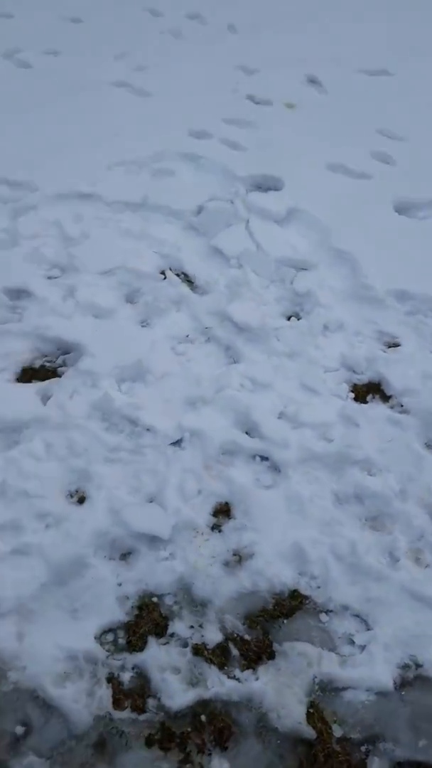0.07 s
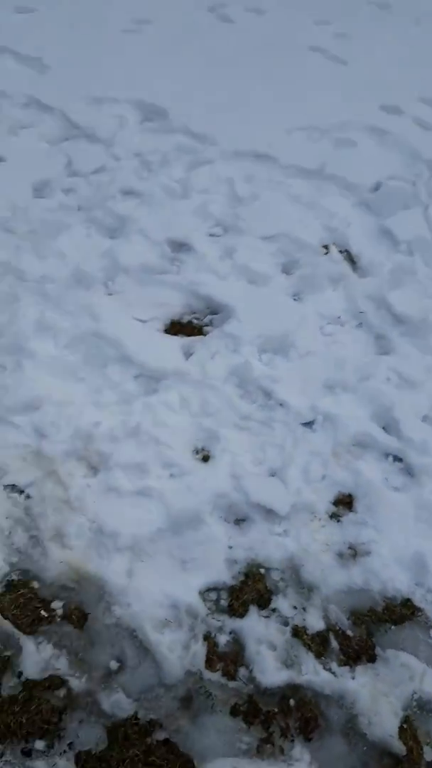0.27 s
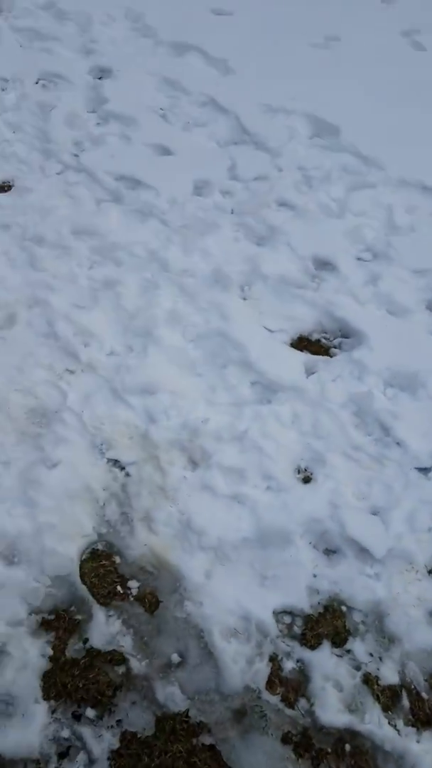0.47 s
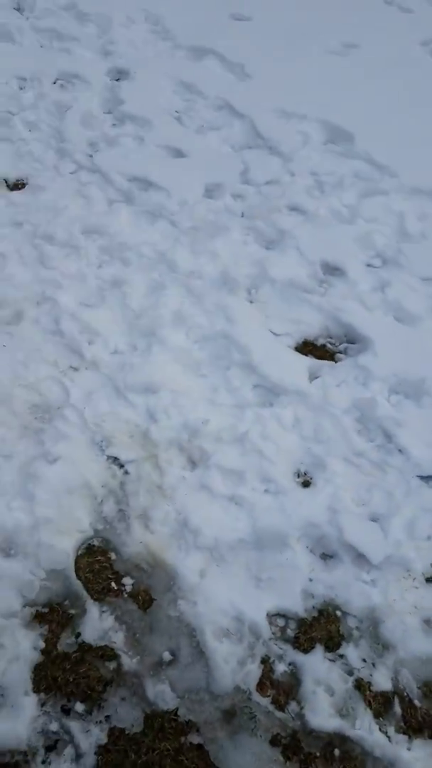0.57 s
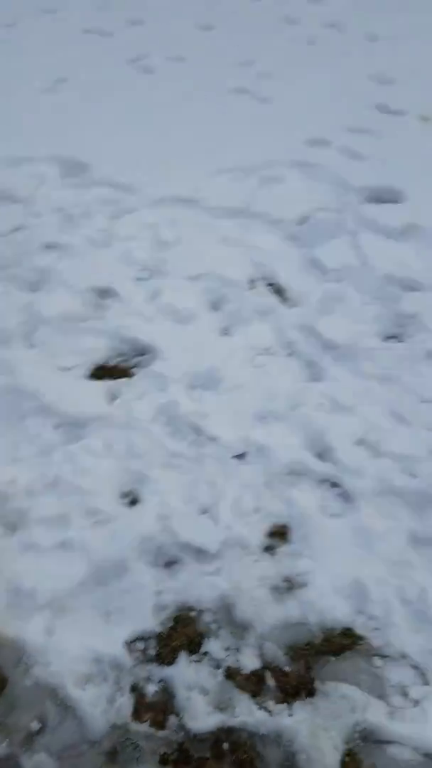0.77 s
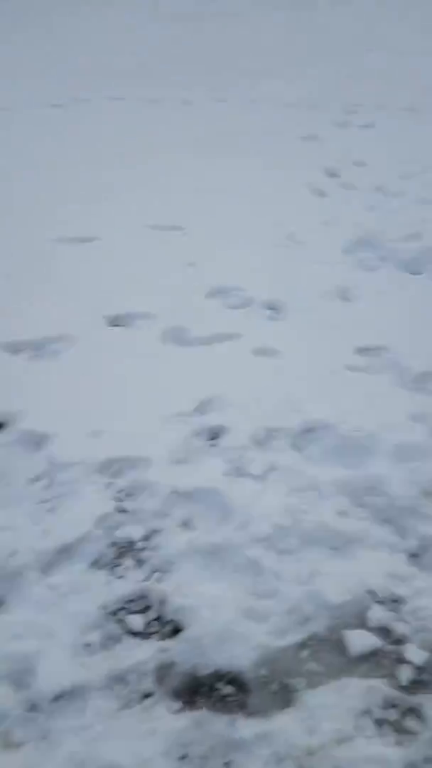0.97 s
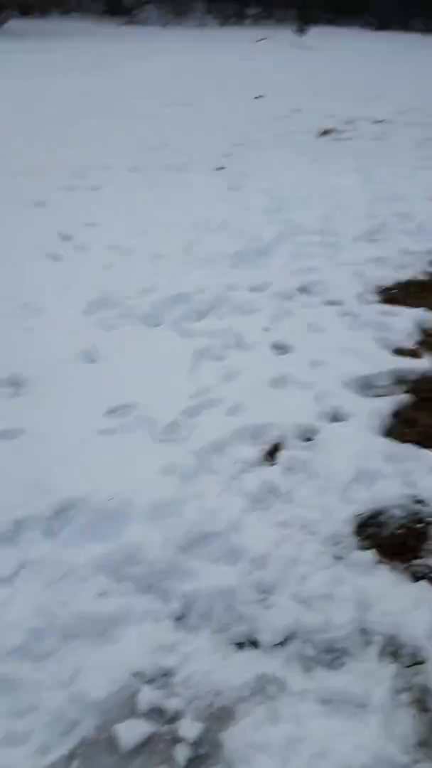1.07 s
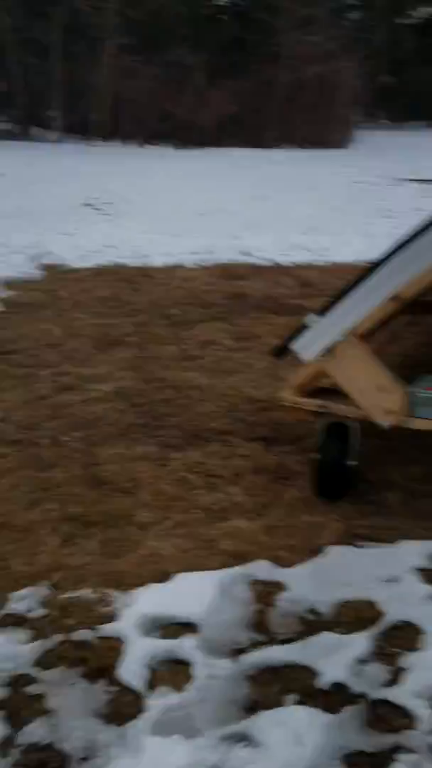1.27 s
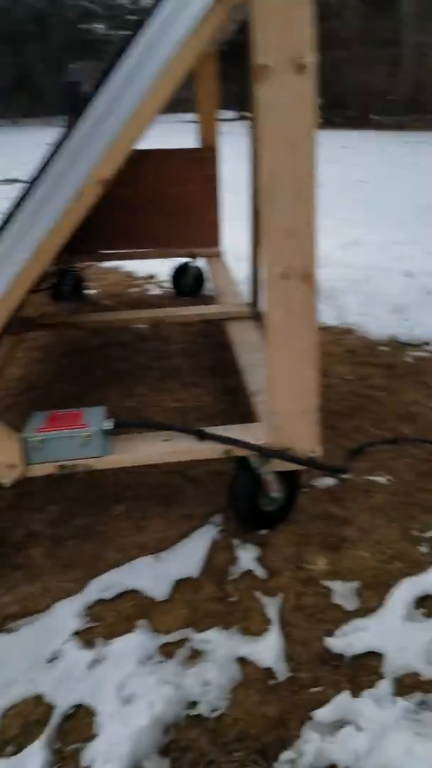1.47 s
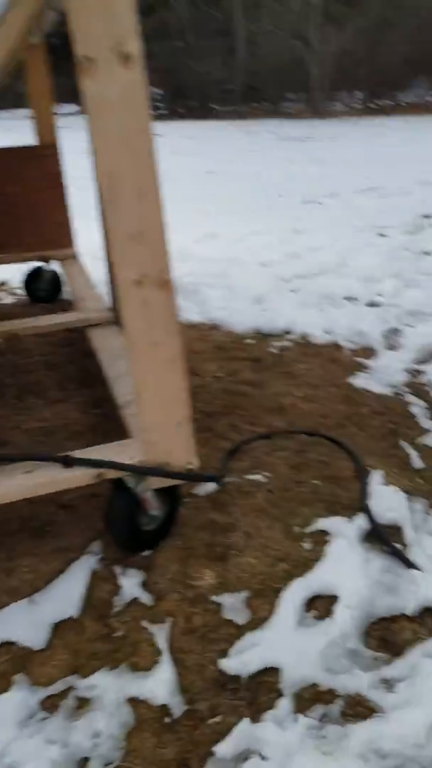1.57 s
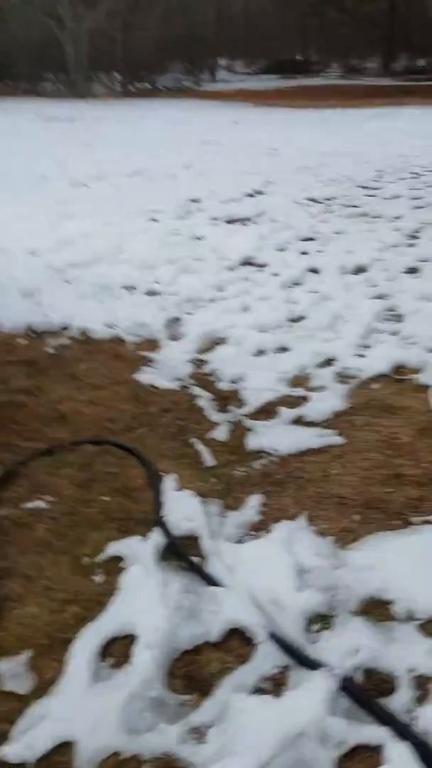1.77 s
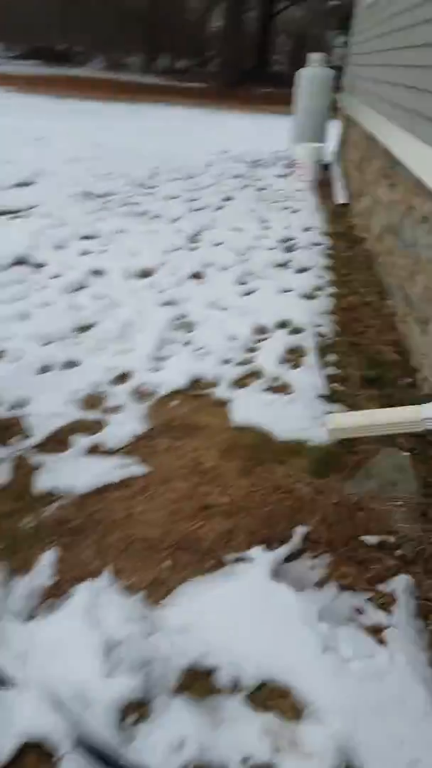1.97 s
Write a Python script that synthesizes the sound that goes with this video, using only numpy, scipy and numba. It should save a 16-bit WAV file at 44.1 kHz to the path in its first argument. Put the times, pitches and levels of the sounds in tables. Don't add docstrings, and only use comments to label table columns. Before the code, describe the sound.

Slow footsteps crunch on thin, crusty wet snow in a quiet yard, close by

```python
import sys
import numpy as np
from scipy import signal
from scipy.fft import irfft, next_fast_len
from scipy.io import wavfile
from scipy.ndimage import uniform_filter1d, map_coordinates
from numba import njit

SR = 44100
rng = np.random.default_rng(int(sys.argv[2]) if len(sys.argv) > 2 else 0)


def put_to_file(sound):
    columns = np.atleast_2d(sound).T
    safe = np.clip(columns, -1, 1)
    whole_steps = np.round(safe * 32767)
    wavfile.write(sys.argv[1], SR, whole_steps.astype(np.int16))


def magnitude_from_level(level_db):
    exponent = np.asarray(level_db, float) / 20
    return 10 ** exponent


N = 89655

# (time [s], level [dB], pitch [Hz], ring t60 [s])
PACKING_THUDS = [(0.0139, -42, 300, 0.018), (.0185, -40.5, 480, 0.018), (0.1254, -21, 586, 0.0067),
                 (.127, -17, 407, 0.01), (0.1325, -36, 560, 0.015), (0.136, -24, 613, 0.05),
                 (0.1409, -26, 510, 0.0056), (0.1463, -28.5, 380, 0.01), (0.1513, -36, 435, 0.0088),
                 (0.1635, -48, 447, 0.024), (0.171, -45, 398, 0.022), (0.1846, -23.5, 400, 0.02),
                 (0.206, -45, 420, 0.04), (0.248, -47, 348, 0.051), (0.5041, -36.5, 230, 0.007),
                 (0.5055, -40.5, 600, 0.011), (0.5218, -32, 200, 0.02), (0.5371, -41, 304, 0.044),
                 (0.944, -45, 190, 0.029), (1.0390, -37, 350, 0.021), (1.1260, -48, 438, 0.068),
                 (1.7036, -45, 450, 0.023), (1.713, -50, 520, 0.012), (1.7232, -27.5, 483, 0.027),
                 (1.7318, -10.5, 476, 0.014), (1.739, -39, 510, 0.014), (1.7426, -36, 565, 0.012),
                 (1.7509, -30.5, 490, 0.0091), (1.7590, -21.5, 563, 0.031), (1.7670, -26, 613, 0.025),
                 (1.7725, -38, 560, 0.013), (1.7795, -38, 527, 0.01), (1.7966, -29.5, 530, 0.0084),
                 (1.806, -50, 406, 0.045), (1.826, -40, 570, .02), (1.87, -42.5, 536, 0.052),
                 (1.9224, -29.5, 565, 0.042), (1.9255, -33.5, 910, 0.026), (1.934, -36.5, 597, 0.015),
                 (2.0209, -37.5, 665, 0.022)]
# (time [s], level [dB], pitch [Hz], treble [dB])
CRUST_SNAPS = [(0.0201, -42.5, 3000, -14), (0.1255, -36, 3150, -10.5), (0.1264, -45, 4800, -13),
               (0.14, -36.5, 3010, -23), (0.148, -51, 1980, -21), (0.1546, -42.5, 2140, -20),
               (0.1838, -45.5, 2100, -19), (0.282, -51, 1780, -29), (0.2929, -50.5, 1870, -28),
               (0.3958, -47, 2100, -13), (0.5042, -51.5, 2030, -24), (0.5539, -43.5, 3300, -17),
               (0.5661, -43, 3100, -18), (0.5744, -50, 3260, -18), (0.5982, -49.5, 2700, -16),
               (0.9826, -44.5, 2290, -15), (0.9824, -49, 5470, -9), (1.035, -45.5, 1600, -18),
               (1.0572, -47.5, 1850, -22), (1.0777, -47, 2960, -15), (1.1123, -41.5, 2120, -20),
               (1.1278, -46, 1880, -17), (1.1673, -42, 1970, -26), (1.2158, -52.5, 4470, 0),
               (1.2435, -55, 2410, -8), (1.272, -66, 3820, -12), (1.289, -69, 3000, 7),
               (1.3354, -48, 5600, -4), (1.7038, -45, 2120, -8), (1.726, -39, 2630, -10),
               (1.7317, -19.5, 1765, -27), (1.7362, -26, 1770, -15), (1.7588, -30, 1570, -26),
               (1.7752, -34, 1970, -27), (1.7414, -31, 2700, -12), (1.7645, -35, 2420, -12),
               (1.7825, -34, 2110, -16), (1.7962, -33, 1530, -13), (1.8086, -41.5, 2170, -15),
               (1.8616, -41.5, 3280, -10), (1.873, -59, 3050, 2), (1.879, -40.5, 1480, -8),
               (1.9044, -41, 2040, -22), (1.9157, -44, 2160, -3.5), (1.9225, -28.5, 2100, -15.5),
               (1.938, -44, 2160, -1), (1.997, -65, 2500, 6)]
# (start [s], level [dB], hold [s], fade t60 [s], treble [dB])
CRUSH_PUSHES = [(0, -58.5, 0.021, 0.022, 2.5), (0.124, -40.5, 0.0049, 0.015, -12.5),
                (0.129, -50, 0.024, 0.073, -16), (0.287, -61.5, 0.1, 0.075, -30),
                (0.53, -58, 0.04, 0.52, -10), (1.046, -62, 0.083, .1, -13),
                (1.201, -60.5, 0.0078, 0.018, 7), (1.213, -55, .006, .015, 4.5),
                (1.336, -55, 0.0037, 0.016, 5.5), (1.341, -59.5, .012, .05, 3),
                (1.6, -56.5, 0.009, 0.02, 5.5), (1.7023, -44.5, 0.038, 0.084, 0),
                (1.7205, -35.5, 0.023, 0.078, -8), (1.748, -42, 0.014, 0.096, -2.5),
                (1.774, -49, 0.01, 0.047, -9), (1.798, -48, 0.0039, 0.05, 0),
                (1.821, -58, 0.017, 0.043, 8.5), (1.852, -56, 0.043, .08, -7.5),
                (1.899, -53, 0.0076, 0.054, 1), (1.922, -38, 0.0065, 0.023, 0),
                (1.958, -62.5, 0.0048, 0.026, 11.5), (1.959, -60, 0.031, 0.53, 2.5),
                (2.02, -56.5, .02, .05, -10)]
# (pitch [Hz], level [dB])
CRYSTAL_TONE = [(300, -9.5), (600, 0), (950, -5), (1950, -3), (3300, -8), (5000, -13.5), (7400, -32.5),
                (10500, -3.5)]
# (time [s], level [dB])
RUSTLE_LEVEL = [
    (0, -65),
    (.25, -67),
    (.55, -63),
    (.85, -64.5),
    (1.1, -61.5),
    (1.4, -57),
    (1.681, -61.5),
    (1.8, -50.5),
    (2.03, -57),
]
# (frequency [Hz], level [dB per third octave])
HUSH_TONE = [(25, -88.5), (60, -74), (100, -71), (300, -70), (800, -66), (1600, -77), (7000, -85.5),
             (13000, -79)]
# (frequency [Hz], likeness [0-1])
HUSH_LIKENESS = [(30, 0.7), (70, 0.88), (130, 0.9), (290, 0.64), (640, 0.43), (1410, 0.1), (3100, 0.01),
                 (15000, 0.0)]


def thuds():
    heavy_db, trim_db, late_s = -20.5, -1.5, 0.00015
    push_cycles, swell_cycles = 0.43, 0.74
    overtone_ratio, overtone_db = 1.586, -6
    out = np.zeros(N)
    for s, db, hz, t60 in PACKING_THUDS:
        push_s, swell_s = push_cycles / hz, swell_cycles / hz
        body = ring(hz, t60, push_s, swell_s)
        overtone = ring(overtone_ratio * hz, 0.35 * t60, push_s * 0.7, swell_s)
        blow = body + magnitude_from_level(overtone_db) * overtone
        direction = np.sign(db - heavy_db)
        add(out, s + late_s - swell_s, direction * magnitude_from_level(db + trim_db) * blow)
    return out


def snaps():
    ring_t60_s, spread_s, crystals_db, per_snap = 0.0094, 0.0006, -12, 24
    cracks = np.zeros(N)
    for s, db, hz, _ in CRUST_SNAPS:
        add(cracks, s + 0.0006, magnitude_from_level(db) * ring(hz, ring_t60_s, 0.0001))
    chance = rng.random(size=(len(CRUST_SNAPS) * per_snap, 5)).T + 1e-9
    chance[0] = 0.35 + 0.65 * chance[0]
    s, db, _, treble_db = np.repeat(CRUST_SNAPS, per_snap, axis=0).T
    at_s = s + 0.00054 - spread_s * np.log(chance[4])
    return cracks + crystals(at_s, magnitude_from_level(db + crystals_db), magnitude_from_level(db + treble_db + 1.0), chance[:4])


def crush():
    grains_per_s, attack_s = 20000, 0.0022
    patch_db, patches_per_s = 3.5, 150
    chance = rng.random(size=(5, int(grains_per_s * N / SR))) + 1e-9
    t = chance[4] * N / SR
    force, frost = 0, 0
    for s, db, hold, t60, treble_db in CRUSH_PUSHES:
        attack = np.clip((t - s) / attack_s, 0, 1)
        fade = 1000 ** (-np.clip(t - s - hold, 0, 2) / t60)
        force = force + magnitude_from_level(db) * attack * fade
        frost = frost + magnitude_from_level(db + treble_db) * attack * fade
    slip = magnitude_from_level(patch_db * walk(patches_per_s))
    slip = slip[(t * SR).astype(int).clip(0, N - 1)]
    return crystals(t, force * slip * magnitude_from_level(-5.0), frost * slip * magnitude_from_level(-4.5), chance[:4])


def crystals(s, body_gain, treble_gain, chance):
    treble_hz, left_treble_db = 7700, -2.5
    size_scatter_db, port_scatter_db, port_spread_s = 1.63, 5.5, 0.00007
    ring_cycles, ring_extra_s = 6.6, 0.00082
    hz = 280 * 57 ** (chance[0] ** 0.6)
    size = magnitude_from_level(curve(CRYSTAL_TONE, hz) - size_scatter_db * np.log(chance[1]))
    port_treble = treble_gain * np.array([[magnitude_from_level(left_treble_db)], [1]])
    size = size * np.where(hz > treble_hz, port_treble, body_gain)
    size = size * magnitude_from_level(port_scatter_db * 4 * (chance[2:] - 0.5))
    size = size * np.sign(np.sin(99 * hz))
    at = np.clip((s + port_spread_s * chance[2:]) * SR, 0, N - 1).astype(np.int64)
    length = SR * (ring_cycles / hz + ring_extra_s)
    turn = 2 * np.pi * hz / SR
    return np.array([grains(a, turn, row, length, count=N) for a, row in zip(at, size)])


@njit
def grains(at, turn, size, length, count):
    out = np.zeros(count + 4000)
    for k in range(len(at)):
        r = np.exp(-6.9 / length[k])
        a, b = 2 * r * np.cos(turn[k]), -r * r
        y, old = size[k] * np.sin(turn[k]), 0.
        for i in range(min(int(length[k] * .6), 3999)):
            out[at[k] + i] += y
            y, old = a * y + b * old, y
    return out[:count]


def ring(hz, t60, push_s, swell_s=1e-5):
    t = np.arange(int(0.08 * SR)) / SR - swell_s
    shape = np.where(t < 0, (1 + t / swell_s) ** 2, 1000 ** (-t / max(t60, 0.002)))
    mode = np.cos(2 * np.pi * hz * t) * shape
    y = np.convolve(mode, np.hanning(int(push_s * SR) + 3))[:len(t)]
    return y / np.abs(y).max()


def rustle():
    db = np.interp(np.arange(N) / SR, *np.array(RUSTLE_LEVEL).T) - 3
    rub = magnitude_from_level(-6 + 4.1 * walk(25.15)) * band(387, 0.55)[0]
    hiss = magnitude_from_level(-12.5 + 1.8 * walk(50)) * band(13400, 0.34)
    flutter = magnitude_from_level(1.27 * walk(39.93) + 0.94 * walk(300))
    cloth = flutter * band(1004.5, 1.6)
    return magnitude_from_level(db) * (cloth + rub + hiss)


def hush():
    swell_db, flicker_db, left_db = 0.9, 1.7, -2.5
    out, swell = 0, walk(2.86)
    for hz in 24 * 2 ** np.arange(0, 9.6, 0.5):
        mid, side = band(hz, 0.33)
        alike = np.clip(curve(HUSH_LIKENESS, hz), 0, 0.99)
        db = curve(HUSH_TONE, hz) + 1.88 + swell_db * swell + flicker_db * walk(11.77)
        spread = np.sqrt(1 - alike) * side * np.array([[1], [-1]])
        out = out + magnitude_from_level(db) * (np.sqrt(1 + alike) * mid + spread) / np.sqrt(2)
    return out * magnitude_from_level(np.array([[left_db], [0]]))


def band(hz, octaves):
    size = next_fast_len(N)
    f = np.arange(1, size // 2 + 2) * SR / size
    bell = np.exp(-(np.log2(f / hz) / octaves) ** 2)
    keep = np.flatnonzero(bell > 0.003)
    noise = rng.standard_normal((2, len(keep))) + 1j * rng.standard_normal((2, len(keep)))
    bins = np.zeros((2, len(f)), complex)
    bins[:, keep] = bell[keep] * noise
    return unit(irfft(bins, size)[:, :N])


def walk(rate):
    steps = np.repeat(rng.standard_normal(int(rate * N / SR) + 2), 8)
    steps = uniform_filter1d(uniform_filter1d(steps, 8), 8)
    return 1.3 * np.interp(np.arange(N) * rate * 8 / SR, np.arange(len(steps)), steps)


def curve(table, hz):
    points = np.array(table)
    return np.interp(np.log(hz), np.log(points[:, 0]), points[:, 1])


def unit(x):
    return x / np.sqrt(np.mean(x ** 2))


def add(out, at, x):
    i = max(int(at * SR), 0)
    out[i:i + len(x)] += x[:N - i]


def late(x, lag_s):
    left = map_coordinates(x[0], [np.arange(N) - lag_s * SR], mode="nearest")
    return np.array([left, x[1]])


def scatter(steps):
    echo_db, echo_t60_s = -13, 0.073
    t = np.arange(int(0.12 * SR)) / SR
    tail = rng.standard_normal((2, len(t))) * 1000 ** (-t / echo_t60_s) * (t > 0.002)
    tail = tail * magnitude_from_level(echo_db) / np.sqrt(np.sum(tail ** 2, axis=1, keepdims=True))
    return signal.fftconvolve(steps, tail, axes=1)[:, :N]


def scene():
    thud_lag_s, crackle_lag_s, left_db = 0.00037, 0.0004443, -2.5
    steps = late(thuds() * np.ones((2, 1)), thud_lag_s) + late(snaps() + crush(), crackle_lag_s)
    steps = steps * magnitude_from_level(np.array([[left_db], [0]]))
    bass_cut = signal.butter(3, 150, "high", fs=SR, output="sos")
    steps = signal.sosfilt(bass_cut, steps)
    return steps + scatter(steps) + hush() + rustle()


def band_limit(x):
    return signal.sosfilt(signal.butter(12, 16790, fs=SR, output="sos"), x)


def record(dry):
    notch_hz, notch_width_hz, notch_share = 7340, 280, 0.073
    cavity = signal.iirpeak(notch_hz, notch_hz / notch_width_hz, fs=SR)
    dip = dry - notch_share * signal.lfilter(*cavity, dry)
    top_cut = signal.ellip(8, 0.3, 30, 15850, fs=SR, output="sos")
    mix = signal.sosfilt(top_cut, dip) - 0.00047
    return band_limit(mix)


dry = scene()
out = record(dry)
put_to_file(out)
```